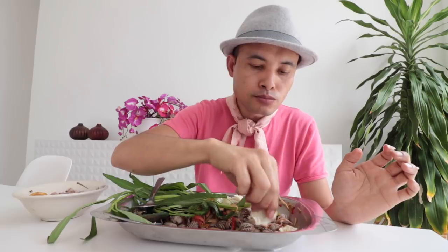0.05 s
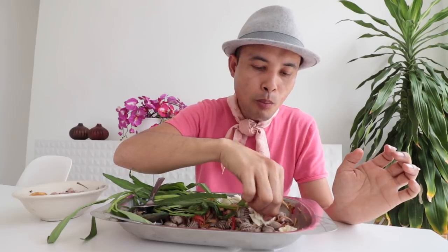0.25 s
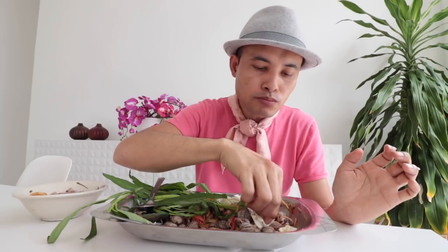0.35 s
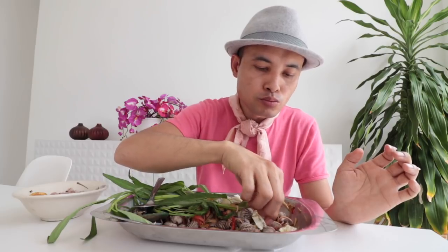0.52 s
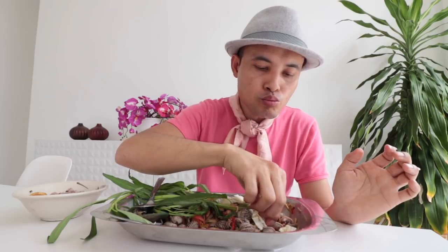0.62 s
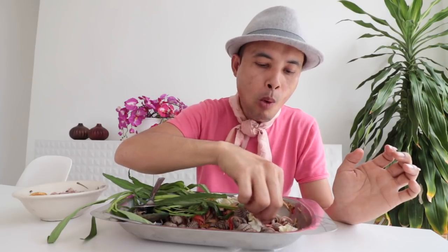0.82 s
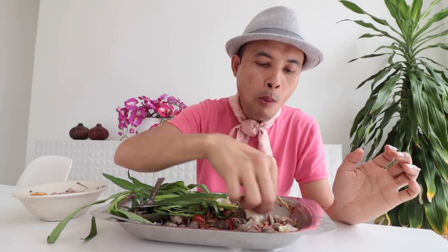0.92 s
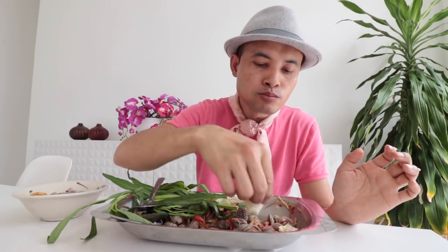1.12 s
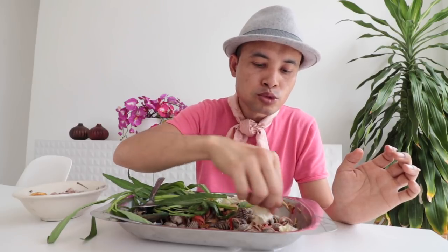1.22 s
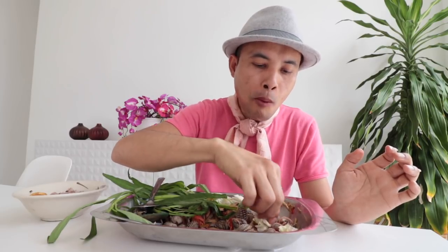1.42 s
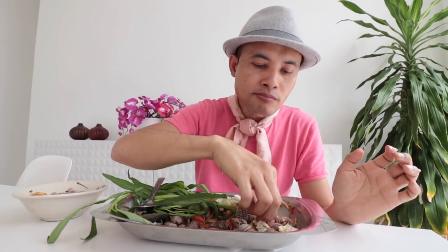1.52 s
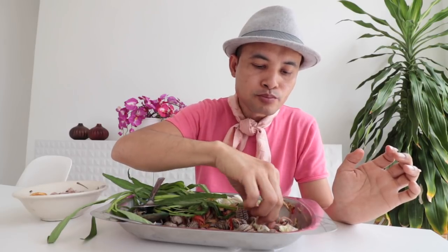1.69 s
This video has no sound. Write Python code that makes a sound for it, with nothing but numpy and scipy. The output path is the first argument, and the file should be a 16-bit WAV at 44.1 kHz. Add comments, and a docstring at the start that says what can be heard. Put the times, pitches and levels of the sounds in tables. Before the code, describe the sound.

Fingers rummage through hard cockle shells on a metal tray, clattering in a bare live room

```python
"""A low room hum runs throughout, while fingers pick through cooked cockle shells on a metal tray.
First come two busy spells of clacks and scrapes, built from bursts of short decaying modes; fine
crackle accompanies them, the tray rings faintly as a sum of sines and gives a few dull bumps.
Then small dry ticks and wet squeaks, made from modal bursts, sound close by, and sparse clacks go on.
A bare, live room answers with wall echoes and a decaying noise tail."""
import sys
import numpy as np
from scipy import signal
from scipy.fft import rfft, irfft
from scipy.io import wavfile

SR = 44100
rng = np.random.default_rng(int(sys.argv[2]) if len(sys.argv) > 2 else 0)


def master(y):
    """Save y as 16-bit WAV."""
    cut = np.clip(np.atleast_2d(y).T, -1, 1)
    pcm = np.round(cut * 32767)  # scale
    wavfile.write(sys.argv[1], SR, pcm.astype(np.int16))


N = 77175
TIME = np.arange(N) / SR
SHORT = TIME[:SR // 12]   # time axis of one brief event

# Room background spectrum: (frequency [Hz], relative spectral density [dB])
HUM_SPECTRUM = [(20, -12), (40, -5), (56, 2.5), (75, -11.5), (120, -8), (200, -15), (350, -11.5),
                (600, -17.5), (1200, -18), (2500, -23.5), (5000, -28.5), (10000, -32), (16000, -33.5)]
HUM_DB = -60.5

# Room reverberation: (frequency [Hz], relative tail level [dB], decay time T60 [s])
ROOM_BANDS = [(250, -15.5, 0.7), (746, -3, 0.54), (1360, -6, 0.88), (2800, -7, 0.77), (5650, -7.5, 0.63),
              (8900, -9.5, 0.48), (15100, -22, .3)]
# Reflections from near walls: (delay [s], level before low-pass [dB])
WALL_ECHOES = [(.0105, -24), (.0175, -20.5), (.0285, -20)]
ROOM_DELAY_S, ROOM_BUILD_S, ECHO_CUT_HZ = 0.0013, 0.0084, 9200

# Dull bumps of the tray on the table: (time [s], fundamental level [dB], pitch [Hz], decay time T60 [s])
TRAY_BUMPS = [(.292, -35, 326, 0.042), (.463, -51.5, 367, 0.1), (0.478, -51.5, 295, 0.077),
              (.823, -50.5, 307, 0.058), (.882, -52, 330, 0.058), (1.142, -54.5, 350, 0.064),
              (1.361, -48, 387, 0.042), (1.655, -54, 321, 0.09)]
BUMP_RISE_S, BUMP_OVERTONE_RATIO, BUMP_OVERTONE_DB = 0.0045, 1.415, -6.5

# Vibration modes of the metal tray: (frequency [Hz], relative level [dB], decay time T60 [s])
TRAY_MODES = [(923, -9.5, 0.94), (1107, 2, 1), (1160, 0, 0.64), (1550, 5, 0.27), (1710, 6, 0.26),
              (1850, -15, 0.32), (2087, -1.5, 0.23), (2070, -18, 0.49), (2432, -6, 0.13), (2580, -22, 0.24),
              (3580, 2, .25), (4667, 13, 0.083), (4840, 2.5, 0.27), (5340, 0, 0.39)]
TRAY_DB = -60

# Fine crackle of wet shells while handled: (start [s], end [s], relative level [dB])
CRACKLE_SPELLS = [(.33, 0.485, -64), (0.688, 1.06, -65), (1.36, 1.52, -88)]
CRACKLES_PER_S, CRACKLE_SPREAD_DB, CRACKLE_HZ = 60, 4.5, 9200

# Tiny wet squeaks close by: (time [s], relative level [dB])
WET_SQUEAKS = [(1.324, -55.5), (1.3444, -46), (1.354, -42.5), (1.366, -42.5), (1.371, -41.5)]
# Modes that each squeak excites: (frequency [Hz], relative level [dB], decay time T60 [s])
SQUEAK_RESONANCES = [(3440, -1.5, 0.017), (3670, -4, 0.0085), (7500, -5, 0.0086), (8100, -5, 0.0075)]
SLIP_S, SLIP_LOSS_DB = 0.0009, 2   # mean spacing of slips, level lost at each

# Ribbed shells sliding: (time [s], length [s], relative level [dB], pitch [Hz], width [octaves])
SHELL_SCRAPES = [(0.235, 0.014, -47.5, 2180, .8), (0.297, 0.028, -44.5, 3200, 0.77),
                 (0.641, 0.076, -43, 3290, 0.53), (0.738, 0.08, -47, 2710, 0.51),
                 (0.852, .06, -51.5, 2000, 1), (1.386, 0.031, -52, 1790, 0.75),
                 (1.439, 0.046, -49, 1770, 0.9)]
RIBS_PER_S, RIB_SPREAD_DB, RIB_T60_S = 290, 0.5, 0.0087   # per sliding shell
RIB_CRACK_DB, RIB_CRACK_HZ, RIB_LOW_HZ, STROKE_EDGE_S = -20, 7900, 1170, 0.0044

# Shell striking shell: (time [s], relative ring level [dB], ring pitch [Hz], width [octaves],
# decay time T60 at the pitch [s], relative crack level [dB], crack pitch [Hz])
SHELL_CLACKS = [(0.2207, -40, 4560, 0.96, 0.02, -35.5, 7600), (0.231, -41, 2460, 1.1, 0.058, -66, 8100),
                (0.2398, -45, 2300, 0.92, 0.039, -57, 7800), (0.2498, -49, 5660, 0.7, 0.0087, -41, 9200),
                (0.2773, -49, 3130, 0.64, 0.024, -44, 9050), (0.2803, -40, 3040, 0.59, 0.027, -56, 9300),
                (0.288, -37, 3136, 0.42, 0.01, -46, 11600), (0.2935, -36, 4600, 0.7, 0.026, -54, 8500),
                (0.3025, -37, 4860, 0.31, 0.015, -47, 8000), (0.3063, -38, 4130, 0.54, 0.0063, -43, 9600),
                (0.315, -29.5, 2860, 0.84, 0.029, -38, 7800), (0.321, -35.5, 2630, 0.34, 0.05, -39, 7800),
                (0.3265, -38.5, 3680, 0.74, 0.027, -46, 8800), (0.3287, -35, 4000, 0.9, 0.014, -38.5, 8900),
                (0.357, -40.5, 3830, 0.69, 0.02, -59, 8200), (0.3635, -48, 2900, 0.42, 0.023, -50, 9400),
                (0.3805, -43.5, 2860, 0.23, 0.052, -49, 8100), (0.398, -42.5, 5000, 0.3, 0.02, -60, 8500),
                (0.431, -48.5, 1790, 1.1, 0.027, -50, 12300), (0.443, -53, 4200, 0.9, 0.019, -43, 10000),
                (0.4665, -46, 2790, 1.74, 0.0089, -66, 7900), (0.4825, -57, 4300, 2.2, 0.022, -48.5, 9300),
                (0.508, -50, 5240, 0.61, 0.032, -73, 7800), (0.6342, -42.5, 3120, 0.68, 0.065, -69, 9980),
                (0.6475, -35.5, 3240, 0.81, 0.028, -45, 8900),
                (0.6893, -39.5, 4800, 0.47, 0.024, -47, 8400), (0.701, -48, 4160, 0.54, 0.037, -57, 8500),
                (0.7312, -37.5, 3130, 0.73, 0.051, -36.5, 8900),
                (0.7445, -40, 4600, 0.38, 0.029, -42, 9100), (0.748, -42.5, 4630, 0.6, 0.017, -43, 8500),
                (0.755, -41, 3900, 0.89, 0.035, -58, 8700), (0.774, -37.5, 4770, 1.1, 0.013, -36, 8250),
                (0.778, -35, 4600, 0.35, 0.036, -41, 7860), (0.784, -38.5, 2450, 0.24, 0.032, -47, 7900),
                (0.7957, -38.5, 4140, 1.5, 0.025, -53, 8500), (0.8167, -37.5, 3400, 1.5, 0.03, -37, 10100),
                (0.8237, -23.5, 2480, 0.88, 0.027, -37, 7900), (0.8402, -35, 2380, 0.98, 0.048, -48, 8000),
                (0.852, -40, 2270, 0.6, 0.037, -64, 8300), (0.8735, -40, 4400, 0.56, 0.087, -46, 7550),
                (0.9013, -34, 4850, 0.71, 0.015, -42.5, 8000), (0.9127, -36, 5200, 1.5, 0.024, -59, 7900),
                (0.9435, -39.5, 3840, 0.59, 0.029, -46, 9500), (0.951, -41, 3000, 0.2, 0.05, -50, 7800),
                (0.998, -46, 3930, 0.67, 0.023, -52, 8700), (1.0055, -45, 3240, 2.6, 0.028, -54, 9450),
                (1.038, -51, 5500, 0.88, 0.028, -61, 9000), (1.0762, -45.5, 2470, 1.26, 0.019, -72, 7900),
                (1.083, -44, 3720, 0.76, 0.016, -43.5, 9900), (1.145, -49.5, 1430, 0.46, 0.028, -73, 9200),
                (1.3995, -41.5, 2030, 0.13, 0.042, -77, 7800), (1.421, -49.5, 2900, 0.91, 0.044, -76, 8100),
                (1.456, -54, 2000, 0.74, 0.025, -82, 8600), (1.505, -50, 1970, 1, 0.028, -60, 7800),
                (1.5945, -52.5, 3500, 0.94, 0.036, -67, 8300), (1.6268, -44, 3150, 1.0, 0.025, -52.5, 7900),
                (1.6765, -54, 2610, 0.7, 0.017, -77, 8500), (1.7275, -44.5, 2370, 0.69, 0.022, -52.5, 8850),
                (1.746, -50, 3330, 0.84, 0.02, -64, 7700)]
# Small dry ticks close by: (time [s], relative ring level [dB], ring pitch [Hz], width [octaves],
# decay time T60 at the pitch [s], relative crack level [dB], crack pitch [Hz])
DRY_TICKS = [(1.2966, -43.5, 1785, 0.77, 0.017, -52.5, 7300),
             (1.3635, -48, 3300, 1.04, 0.029, -50.5, 12600), (1.3725, -48, 2770, 1.1, 0.014, -70, 11000),
             (1.379, -61, 2500, 1.7, 0.031, -54, 12500), (1.495, -58, 3700, 0.35, .02, -60.5, 11000)]
SHELL_SKIRT_DB, SHELL_LOW_HZ, SHELL_TOP_HZ = -18, 735, 8340
HIGHS_DIE_SOONER = 0.26   # exponent of decay time against inverse frequency
CRACK_T60_S, CRACK_WIDTH_OCT, CRACK_LOW_HZ = 0.018, 0.49, 5400
CONTACT_S = 0.00024       # linear rise of every modal burst
LEVEL_WINDOW_S = 0.005    # sets the gain of unit-energy contacts

# Colour of the heap of shells: (frequency [Hz], gain [dB])
HEAP_COLOUR = [(400, 0.5), (560, -5), (780, 0), (1050, -1.5), (1300, 0), (1600, -1.5), (2100, 2),
               (2700, 0.5), (3400, -1), (4200, 1), (5000, 3), (6200, 0.5), (8600, 1.5), (10700, -6),
               (13000, 0.5), (16000, -4.5)]

# Mix: gains [dB], then amounts sent to the room [linear]
CLACK_DB, TICK_DB, CRACK_DB, SIDE_DB = -1, 0, -3, -39
TICK_WET, SQUEAK_WET = 0.64, 0.17
CUTOFF_HZ = 16000


def from_db(db):
    """Amplitude ratio: 20 dB is a factor of ten."""
    return 10 ** (np.asarray(db) / 20)


def unit(x):
    """Energy normalisation: the squared samples sum to one."""
    return x / np.sqrt(np.sum(x ** 2) + 1e-20)


def dying(t, t60):
    """Exponential decay: damping takes off 60 dB in one T60."""
    return from_db(-60 * t / np.maximum(t60, 1e-3))


def cut(x, hz, kind, order=2):
    """Butterworth filtering: a maximally flat passband."""
    sos = signal.butter(order, np.clip(hz, 10, .48 * SR), kind, fs=SR, output="sos")
    return signal.sosfilt(sos, x)


def at_hz(table, hz, axis=1):
    """Interpolation of a table column along logarithmic frequency."""
    table = np.array(table)
    return np.interp(np.log(hz), np.log(table[:, 0]), table[:, axis])


def add(out, s, x):
    """Superposition: an event adds to the sound already present."""
    i = int(s * SR)
    out[i:i + len(x)] += x[:max(N - i, 0)]


def coloured(x, table):
    """Spectral shaping: each frequency is multiplied by a smooth gain."""
    hz = np.maximum(np.fft.rfftfreq(2 * N, 1 / SR), 1)
    spectrum = rfft(x, 2 * N) * from_db(at_hz(table, hz))
    return irfft(spectrum)[:N]


def hump(hz, centre_hz, width_oct):
    """Resonance region: modal strength is Gaussian in octaves about a centre."""
    return np.exp(-.5 * (np.log2(hz / centre_hz) / width_oct) ** 2)


def modal_burst(hz, gain, t60):
    """Modal superposition: one brief contact excites a cluster of damped sines."""
    cycles = hz[:, None] * SHORT + rng.random((len(hz), 1))
    modes = np.sin(2 * np.pi * cycles) * dying(SHORT, t60[:, None])
    return gain @ modes * np.minimum(SHORT / CONTACT_S, 1)


def hum():
    """Stationary noise: a steady low rumble and faint hiss of the room."""
    return from_db(HUM_DB) * np.sqrt(N) * unit(coloured(rng.standard_normal(N), HUM_SPECTRUM))


def room(x):
    """Reverberation: a few wall echoes and a diffuse tail whose treble dies first."""
    edges = np.geomspace(150, 18000, 15)
    white = rng.standard_normal((2, N))
    build = np.clip((TIME - ROOM_DELAY_S) / ROOM_BUILD_S, 0, 1)
    tail = 0
    for k, band in enumerate(zip(edges, edges[1:])):
        hz = np.sqrt(band[0] * band[1])
        noise = cut(white[k % 2], band, "band")   # neighbouring bands use different noise
        envelope = unit(build * dying(TIME, at_hz(ROOM_BANDS, hz, axis=2)))
        tail = tail + from_db(at_hz(ROOM_BANDS, hz)) * noise * envelope
    walls = np.zeros(N)
    for s, db in WALL_ECHOES:
        add(walls, s, from_db([db]))
    response = tail + cut(walls, ECHO_CUT_HZ, "low")
    return signal.fftconvolve(x, response)[:N]


def bumps():
    """Damped vibration: soft pushes give a low, short note with one overtone."""
    out = np.zeros(N)
    for s, db, hz, t60 in TRAY_BUMPS:
        rise = np.minimum(SHORT / BUMP_RISE_S, 1) ** 2
        shape = rise * dying(np.maximum(SHORT - BUMP_RISE_S, 0), t60)
        phase = 2 * np.pi * hz * SHORT
        overtone = from_db(BUMP_OVERTONE_DB) * np.sin(BUMP_OVERTONE_RATIO * phase)
        add(out, s, from_db(db) * shape * (np.sin(phase) + overtone))
    return out


def tray(shells):
    """Forced modal response: the shells set the metal ringing faintly beneath them."""
    ring = np.zeros(N)
    for k, (hz, db, t60) in enumerate(TRAY_MODES):
        polarity = (-1) ** k
        ring += polarity * from_db(db) * dying(TIME, t60) * np.sin(2 * np.pi * hz * TIME)
    return from_db(TRAY_DB) * signal.fftconvolve(shells, ring)[:N]


def crackle():
    """Random impulses: films of juice part in tiny snaps at chance moments."""
    out = np.zeros(N)
    for start, end, db in CRACKLE_SPELLS:
        happens = rng.random(N) < CRACKLES_PER_S / SR
        strength = from_db(CRACKLE_SPREAD_DB * rng.standard_normal(N))
        snaps = happens * strength * (TIME > start) * (TIME < end)
        sound = unit(signal.fftconvolve(snaps, crack(CRACKLE_HZ))[:N])
        out += from_db(db) * np.sqrt((end - start) * SR) * sound
    return out


def squeaks(count=3):
    """Repeated slip: a few quick slips excite the same high modes, each one weaker."""
    out = np.zeros(N)
    hz, mode_db, t60 = np.transpose(SQUEAK_RESONANCES)
    for s, db in WET_SQUEAKS:
        for k in range(count):
            slip_time = s + k * SLIP_S * (.5 + rng.random())
            gain = from_db(db + mode_db - k * SLIP_LOSS_DB)
            add(out, slip_time, modal_burst(hz, gain, t60))
    return out


def scrapes(count=3):
    """Friction as serial impact: ribs of a few shells catch in dense uneven runs of tiny contacts."""
    out = np.zeros(N)
    for s, length, db, hz, width in SHELL_SCRAPES:
        stroke = np.clip(np.minimum(SHORT, length - SHORT) / STROKE_EDGE_S, 0, 1)
        rasp = 0
        for _ in range(count):
            catches = rng.random(len(SHORT)) < RIBS_PER_S / SR
            strength = from_db(RIB_SPREAD_DB * rng.standard_normal(len(SHORT)))
            ribs = catches * strength * rng.choice([-1, 1], len(SHORT)) * stroke
            contact = shell_ring(hz, width, RIB_T60_S) + from_db(RIB_CRACK_DB) * crack(RIB_CRACK_HZ)
            rasp = rasp + signal.fftconvolve(ribs, contact)
        rasp = unit(cut(rasp, RIB_LOW_HZ, "high"))
        add(out, s, from_db(db) * rasp * np.sqrt(length * SR))
    return out


def shell_ring(pitch_hz, width_oct, t60, count=56):
    """Modal ringing: a struck shell has many short modes, strongest around one pitch; unit energy."""
    hz = np.geomspace(450, 11000, count) * np.exp(rng.uniform(-.025, .025, count))
    gain = hump(hz, pitch_hz, width_oct) + from_db(SHELL_SKIRT_DB)
    ring = modal_burst(hz, gain, t60 * (pitch_hz / hz) ** HIGHS_DIE_SOONER)
    return unit(cut(cut(ring, SHELL_LOW_HZ, "high"), SHELL_TOP_HZ, "low"))


def crack(pitch_hz, count=26):
    """Hard impact: meeting edges excite high modes as a bright clink; unit energy."""
    hz = np.linspace(5000, 15700, count) + rng.uniform(-220, 220, count)
    clink = modal_burst(hz, hump(hz, pitch_hz, CRACK_WIDTH_OCT), np.full(count, CRACK_T60_S))
    return unit(cut(clink, CRACK_LOW_HZ, "high"))


def contacts(table):
    """Impact excitation: each contact is a crack together with a short ring."""
    out = np.zeros(N)
    for s, db, hz, width, t60, crack_db, crack_hz in table:
        ring = from_db(db) * shell_ring(hz, width, t60)
        clink = from_db(crack_db + CRACK_DB) * crack(crack_hz)
        add(out, s, ring + clink)
    return out * np.sqrt(LEVEL_WINDOW_S * SR)


def scene():
    """Mid and side superposition: nearly mono, with a little room and hum differing between the ears."""
    clacks = from_db(CLACK_DB) * contacts(SHELL_CLACKS)
    shells = coloured(clacks + scrapes() + crackle(), HEAP_COLOUR)
    handling = shells + tray(shells) + bumps()
    ticks = from_db(TICK_DB) * contacts(DRY_TICKS)
    slips = squeaks()
    reverberation = room(handling + TICK_WET * ticks + SQUEAK_WET * slips)
    mid = handling + ticks + slips + reverberation + hum()
    side = from_db(SIDE_DB) * (room(handling) + hum())   # fresh noise in the tail and hum
    return np.array([mid + side, mid - side])


def record(dry):
    """Band limiting: a steep elliptic low-pass removes the top of the spectrum."""
    return signal.sosfilt(signal.ellip(10, .1, 80, CUTOFF_HZ, fs=SR, output="sos"), dry)


dry = scene()
out = record(dry)
master(out)
```